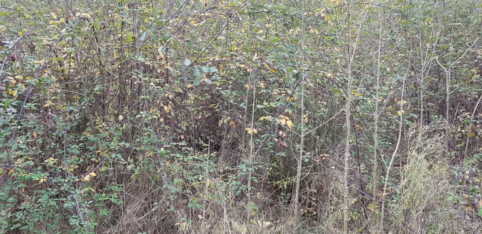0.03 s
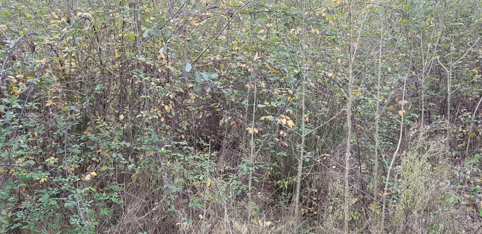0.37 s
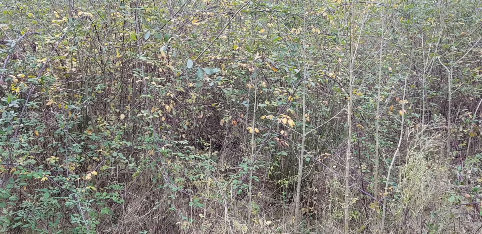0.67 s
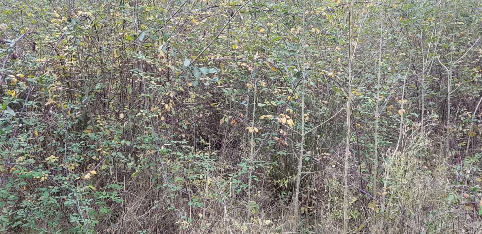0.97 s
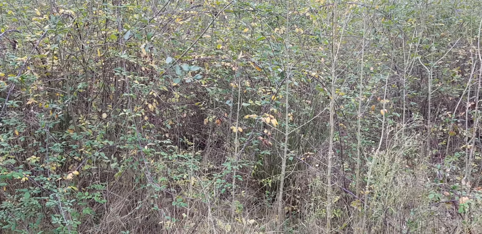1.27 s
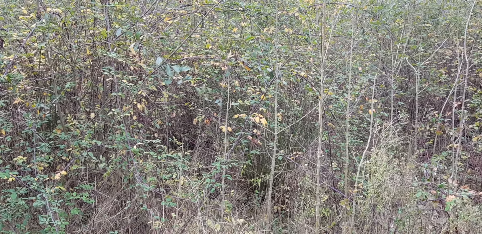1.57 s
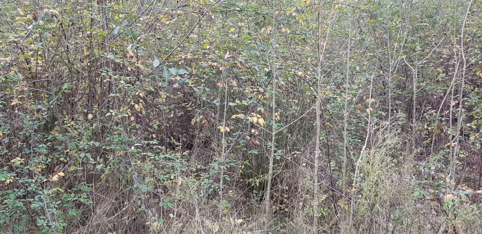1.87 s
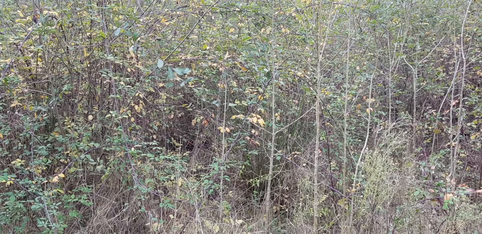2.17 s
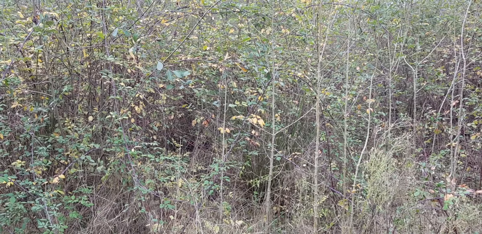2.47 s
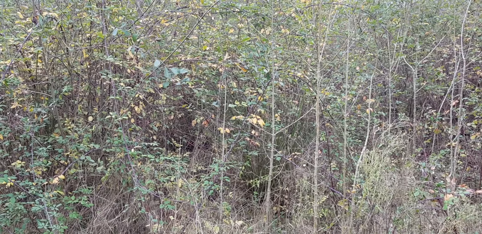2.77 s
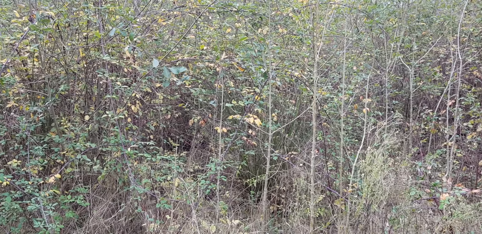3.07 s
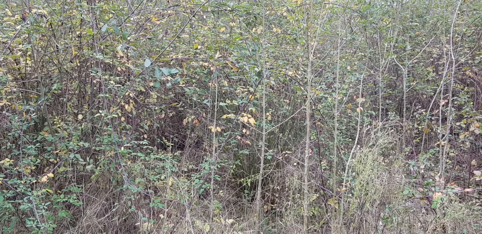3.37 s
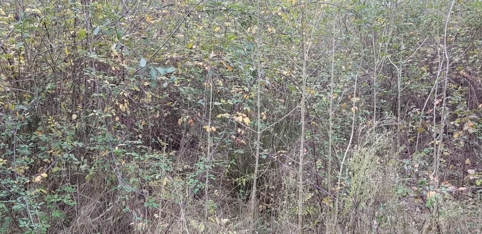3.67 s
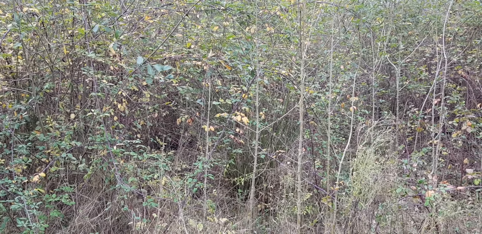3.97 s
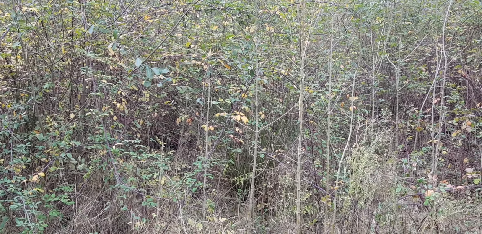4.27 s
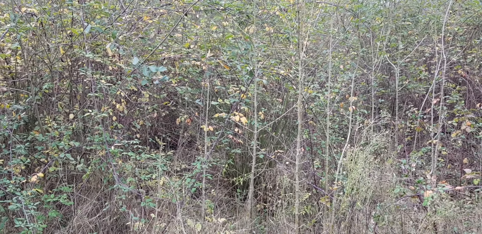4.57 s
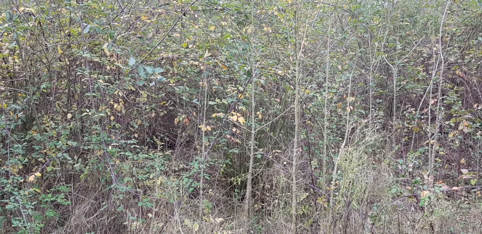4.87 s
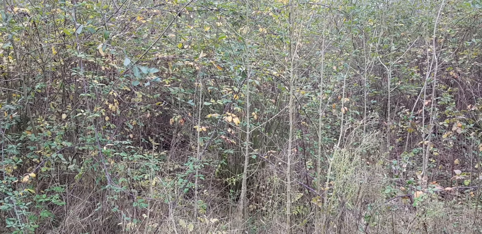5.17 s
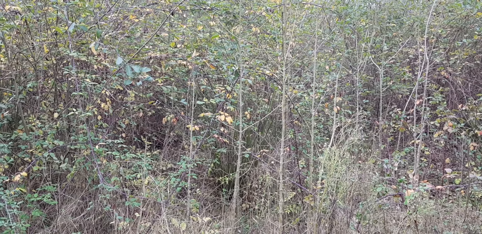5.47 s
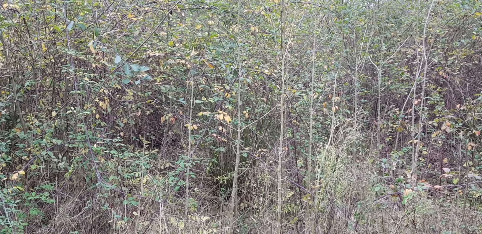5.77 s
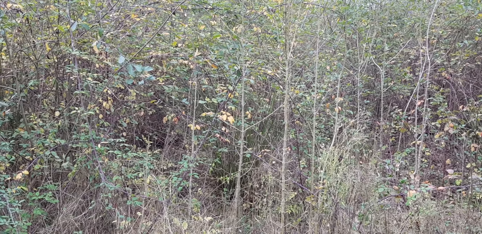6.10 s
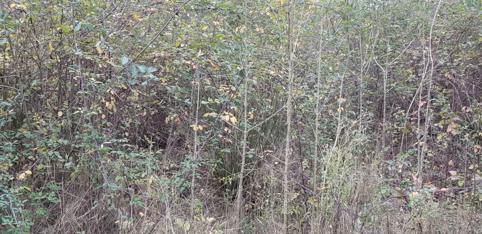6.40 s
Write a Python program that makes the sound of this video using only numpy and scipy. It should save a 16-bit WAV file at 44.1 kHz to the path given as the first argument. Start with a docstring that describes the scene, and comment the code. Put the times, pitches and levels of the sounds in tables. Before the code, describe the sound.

A hound gives short, high yelping bays in dense woodland scrub, the loudest sounds here. Each begins as a clean squeal, cracks hoarse and drops at the end, ringing briefly among the trees. The first three come at about 0.5, 1.1 and 2 seconds, with a fainter, echoing, falling yelp from a distant hound just ahead of the second. In the lull a dog gives one thin, quiet nasal whine at about 3.6 seconds. The near hound bays again, rougher, at 4.7 seconds. From 5 to nearly 6 seconds a farther hound holds a softer, lower howl that sags slightly. A tiny yip at its end leads to a last strong bay at about 6.2 seconds. Light wind rumbles on the microphone in puffs, mainly in the first second and again around 3 to 3.6 seconds. Underneath are a very faint hiss and a few barely audible leaf rustles.

```python
"""In a wood of dense scrub, a hound gives short yelping bays. Each starts as a clean squeal and drops
at the end; most break to half pitch on the way, as the period of the vocal folds doubles. Farther off
another hound yelps and later holds a long howl; one whines through its nose close by. Stems and trunks
scatter every call, so the wood rings. Light wind buffets the microphone over a faint hiss, and dry
leaves rustle now and then."""
import sys
import numpy as np
from scipy import signal
from scipy.fft import rfft, irfft
from scipy.io import wavfile

SR = 44100
rng = np.random.default_rng(int(sys.argv[2]) if len(sys.argv) > 2 else 0)


def wrap_up_sound(samples):
    """Save the sound to the file named by the first command line argument, as 16-bit audio."""
    columns = np.atleast_2d(samples).T
    # keep every value between -1 and 1, then stretch to whole-number steps
    tamed = np.clip(columns, -1, 1)
    steps = np.round(tamed * 32767).astype(np.int16)
    wavfile.write(sys.argv[1], SR, steps)


N = 288414
EDGE_HZ = 14500  # upper band limit


def gain_of(db):
    """Logarithmic level: 20 dB is a factor of ten in amplitude."""
    return 10 ** (np.asarray(db) / 20)


def unit_rms(x):
    """Power normalisation: scales to rms 1."""
    return x / np.sqrt(np.mean(abs(x) ** 2) + 1e-20)


def value_at(points, hz):
    """Interpolation of (frequency, value) points on a log-frequency axis."""
    f, value = np.transpose(points)
    return np.interp(np.log(hz + 1), np.log(f + 1), value)


def add(mix, start_s, sound):
    """Superposition: sums a sound into the mix."""
    part = mix[..., max(round(start_s * SR), 0):][..., :sound.shape[-1]]
    part += sound[..., :part.shape[-1]]


def placed(start_s, sound):
    """Time shift: a sound alone on a silent track."""
    track = np.zeros(N)
    add(track, start_s, sound)
    return track


def flutter(shape, hz):
    """Random modulation: complex noise low-passed at hz, rms 1."""
    white = rng.standard_normal(shape) + 1j * rng.standard_normal(shape)
    return unit_rms(signal.sosfilt(signal.butter(2, hz, fs=SR, output="sos"), white))


def noise(spectrum):
    """Spectral shaping: coloured noise, uncorrelated in the two channels, rms 1."""
    colour = gain_of(value_at(spectrum, np.fft.rfftfreq(N, 1 / SR)))
    return unit_rms(irfft(rfft(rng.standard_normal((2, N))) * colour, N))


def ports(x, lag_ms, pan_db):
    """Time and level difference between the two microphone ports, left minus right."""
    side, hz = np.array([[.5], [-.5]]), np.fft.rfftfreq(len(x), 1 / SR)
    delay = np.exp(-2j * np.pi * hz * side * lag_ms / 1000)
    return irfft(rfft(x) * delay, len(x)) * gain_of(pan_db * side)


def wind():
    """Turbulence: eddies buffet the microphone in puffs over a nearly steady breeze."""
    # puffs of wind: (start [s], length [s], relative level [dB])
    gusts = [(0.004, 0.011, -43.5), (0.042, 0.042, -43), (0.184, 0.055, -65), (0.348, 0.16, -39.5),
             (0.59, 0.19, -45), (0.816, 0.03, -59), (0.86, 0.25, -38), (1.471, 0.05, -47.5),
             (1.519, 0.023, -50), (2.215, 0.096, -47), (3.017, 0.032, -43), (3.355, 0.069, -44),
             (3.555, 0.077, -43), (5.669, 0.029, -49)]
    # eddy spectrum: (frequency [Hz], relative density [dB])
    spectrum = [(15, -23.5), (28, -10), (48, -2.5), (68, 0), (110, -8), (160, -17.5), (210, -23),
                (300, -27.5), (450, -40.5), (1000, -50), (3000, -82)]
    spread, eddy_s = 0.41, 0.024  # a puff's half width: this share of its length plus one eddy
    t = np.arange(N) / SR
    puff_power = sum(gain_of(db + 1) ** 2 * np.exp(-((t - s - length / 2) / (spread * length + eddy_s)) ** 2)
                     for s, length, db in gusts)
    breeze = gain_of(-57 + 0.01 * t)
    bumps = gain_of(5.0 * flutter((2, N), 13).real)
    eddies = noise(spectrum) * bumps
    partly_shared = unit_rms(eddies + 0.21 * eddies[::-1])
    return np.sqrt(breeze ** 2 + puff_power) * partly_shared


def air():
    """Broadband noise: a faint hiss, coloured a little differently at each port."""
    # hiss spectrum: (frequency [Hz], relative density [dB])
    spectrum = [(180, -41), (300, -28.5), (430, -14.5), (660, -7.5), (800, -15), (1400, -16), (1750, -18.5),
                (4000, -19), (7500, -22), (14300, -19)]
    # slow drift of the hiss: (time [s], level [dB])
    drift = [(0, -70.5), (1.501, -67), (2.602, -68), (4.2, -67), (6.54, -65)]
    # balance of the hiss: (frequency [Hz], left minus right [dB])
    balance = [(2000, -1.5), (6000, -2.5), (8000, 3.5), (10500, 8), (12000, 2), (14000, 2)]
    tilt = gain_of(np.array([[.5], [-.5]]) * value_at(balance, np.fft.rfftfreq(N, 1 / SR)))
    level = gain_of(np.interp(np.arange(N) / SR, *np.transpose(drift)))
    return level * irfft(rfft(noise(spectrum)) * tilt, N)


def call_course(tune, break_s=0, mend_s=0, depth=0, rough=0, bright_db=0, widest=0.5):
    """Register change: the course of a call that swells, tires and, given a depth, breaks."""
    attack_db, attack_s, release_db, release_s = 20, 0.0064, 3, 0.0022
    ring_hz, ring_width_hz, ring_db = 731, 135, 10.5  # main resonance of the throat
    flip_s, deepen_s = .005, 0.024  # time to change register; to double again at roughness 1
    waver_s, waver_share = 0.0082, 0.26  # the half pitch creeps in just ahead of the break
    clean_rough, tired_rough, flip_rough = 0.0077, .12, 0.12
    s, hz, effort = np.transpose(tune)
    t = np.linspace(s[0], s[-1], 200)
    hz, effort = np.interp(t, s, hz), np.interp(t, s, effort)
    along = (t - t[0]) / (t[-1] - t[0])
    effort -= attack_db * np.exp((t[0] - t) / attack_s) + release_db * np.exp((t - t[-1]) / release_s)
    fundamental_db = effort + ring_db / (1 + ((hz - ring_hz) / ring_width_hz) ** 2)
    overtones_db = effort + bright_db - 54 * (along - widest) ** 2  # the mouth opens and shuts
    in_break = (1 + np.tanh((t - break_s) / flip_s)) / 2 * (1 + np.tanh((mend_s - t) / flip_s)) / 2
    doublings = in_break * np.minimum(depth, 1 + np.maximum(t - break_s, 0) * rough / deepen_s)
    doublings = np.maximum(doublings, waver_share * min(depth, 1) * np.exp(-abs(t - break_s) / waver_s))
    flipping = np.sin(np.pi * in_break) ** 2
    roughness = clean_rough + tired_rough * along ** 2 + rough * in_break + flip_rough * flipping
    return np.transpose([t, hz, fundamental_db, overtones_db, doublings, roughness])


def voice(course, tract, jitter, shimmer, count):
    """Source and filter: vocal folds, whose period can double twice, sound through a tract."""
    s, *columns = np.transpose(course)
    t = np.arange(s[0], s[-1], 1 / SR)
    hz, low_db, overtones_db, doublings, rough = (np.interp(t, s, c) for c in columns)
    rough = np.clip(rough, 0, 1)
    hz = hz * (1 + jitter * (rough + 0.041) * flutter(len(t), 70).real)
    multiple = np.arange(1, count + 1)[:, None] / 4  # spectral lines a quarter of the pitch apart
    # each doubling fills in lines midway between the existing ones
    halves = np.clip(doublings, 0, 1) * np.where(multiple < 1, 1.05, .58)
    quarters = np.clip(doublings - 1, 0, 1) * np.where(multiple < 1, .7, .35)
    lines = np.where(multiple % 1 == 0, 1, np.where(multiple % .5 == 0, halves, quarters))
    smear = rough * (0.2 + 0.36 * multiple)  # irregular closures smear the high lines most
    colour = gain_of(value_at(tract, multiple * hz)) * (multiple * hz < EDGE_HZ)
    power = colour ** 2 * (lines ** 2 + smear ** 2)
    low = multiple[:, 0] < 1.4  # the fundamental and its neighbours share one level
    low_gain = gain_of(low_db) / np.sqrt(power[low].sum(0))
    overtone_gain = gain_of(overtones_db) / np.sqrt(power[~low].sum(0))
    gain = np.where(low[:, None], low_gain, overtone_gain)
    cycles = np.cumsum(hz) / SR
    phase = 2 * np.pi * multiple * cycles - multiple ** 2
    partials = gain * colour * (lines + smear * flutter(colour.shape, 72)) * np.exp(1j * phase)
    fade = np.clip(np.minimum(t - t[0], t[-1] - t) / 0.005, 0, 1)
    return np.sqrt(2) * fade * (1 + shimmer * flutter(len(t), 35).real) * partials.sum(0).real


def scatter(x, t60_scale, build_s):
    """Multiple scattering: echoes from stems and trunks build up, then die band by band."""
    # ring of the wood: (frequency [Hz], T60 at t60_scale 1 [s])
    ring = [(400, 1.62), (1000, 1.8), (2400, 1.75), (3500, 3.2), (8000, 0.41)]
    # colour of the echoes: (frequency [Hz], relative gain [dB])
    colour = [(500, 0.5), (1500, 7), (2600, 7.5), (3200, -16.5), (4000, -5), (8000, -8.5)]
    count, slot = 3000, 22  # one echo in every slot of samples
    arrivals = np.arange(count) * slot + rng.integers(0, slot, (2, count))
    taps = np.zeros((2, arrivals.max() + 1))
    np.put_along_axis(taps, arrivals, rng.choice([-1., 1.], arrivals.shape), 1)
    hz, t, bands = signal.stft(taps, SR, nperseg=256)
    t60 = t60_scale * value_at(ring, hz)[:, None]
    envelope = np.exp(-np.log(1000) * t / t60) * (1 - np.exp(-t / build_s))
    tail = signal.istft(bands * envelope * gain_of(value_at(colour, hz))[:, None], SR, nperseg=256)[1]
    tail /= np.sqrt(np.mean(abs(rfft(tail)[:, 600:3600]) ** 2))  # gain 1 over about 400-2400 Hz
    return signal.fftconvolve(x[None], tail, axes=1)[:, :N]


def near_hound():
    """Period doubling: squeals break into hoarse bays, echoed by the bushes and the wood."""
    # tune of each bay: (time [s], pitch [Hz], effort [dB])
    tunes = [
        [(.438, 713, -48), (.474, 766, -34), (.486, 978, -34), (.535, 934.6, -33.5), (.552, 956.6, -29.5),
         (.595, 943.7, -30.5), (.638, 1014, -32), (.652, 747, -40), (.664, 583, -30.5)],
        [(1.03, 790, -52.5), (1.07, 813, -36.5), (1.095, 980, -40.5), (1.124, 997, -34), (1.133, 1218, -29.5),
         (1.162, 1183, -24), (1.172, 1042, -31.5), (1.245, 943.4, -27.5), (1.262, 984, -25.5),
         (1.28, 1022, -37), (1.311, 535, -34.5)],
        [(2.01, 799, -48.5), (2.045, 760, -35.5), (2.087, 721, -32), (2.091, 846, -37.5), (2.125, 924, -32.5),
         (2.152, 925.6, -29), (2.156, 688, -32.5), (2.183, 708, -31), (2.211, 598, -37)],
        [(4.681, 1429, -24.5), (4.71, 1341, -38.5), (4.728, 1218, -27.5), (4.77, 1067, -31),
         (4.802, 1063, -40.5), (4.814, 1152, -27.5), (4.853, 1157, -38), (4.864, 740, -33.5),
         (4.878, 620, -35.5)],
        [(5.795, 620, -38), (5.808, 733, -38), (5.834, 584, -48.5)],
        [(6.118, 828, -21.5), (6.131, 875, -41), (6.157, 1384, -45), (6.183, 1334, -46), (6.203, 1306, -24.5),
         (6.229, 1152, -27.5), (6.243, 1014, -27), (6.287, 1022, -25), (6.32, 1068, -27.5), (6.335, 1153, -39),
         (6.357, 1154, -46.5), (6.381, 593, -37.5)],
    ]
    # voice break, colour and bearing of each bay: (break [s], mend [s], depth [doublings],
    # roughness [0-1], overtones over effort [dB], mouth widest [share of the bay],
    # resonance shift [factor], treble gain [dB], lag of the left port [ms], left minus right [dB])
    bays = [(0.47, 0.611, 1.22, 0.2, -7.5, 0.44, 0.96, -9, -0.076, 0.4),
            (1.167, 1.277, 1.3, 0.18, -11.5, 0.56, 1.005, -3, -0.099, 0.16),
            (2.08, 2.169, 0.89, 0.12, -2, 0.37, 0.94, 4, -0.042, -1.9),
            (4.765, 4.806, 2.3, 0.29, 2.5, .55, 1.038, 6.5, 0.039, -0.32),
            (5.78, 5.792, 0, 0.11, -17, 0.41, 1.5, -5, 0.13, 0.76),
            (6.234, 6.314, 1.5, 0.27, -4, 0.43, 1.114, 10, 0.1, -3.1)]
    # resonances of the open throat: (frequency [Hz], relative gain [dB])
    throat = [(250, -39.5), (370, -22.5), (480, 0), (740, 19.5), (1000, 2.5), (1400, -3.5), (1900, -5),
              (2400, -8), (2850, -17), (3250, -25.5), (3700, -24.5), (4250, -41), (5000, -62.5),
              (8000, -68.5)]
    # hiss of a hoarse throat: (frequency [Hz], relative density [dB])
    rasp_spectrum = [(2000, -27), (3500, 6), (4500, 2.5), (7000, -2.5), (9500, -6.5), (12000, -20.5),
                     (14000, -33)]
    direct = np.zeros((2, N))
    for tune, (*manner, shift, treble_db, lag_ms, pan_db) in zip(tunes, bays):
        # each bay has its own shift of the throat resonances and its own treble level
        tract = [(hz * shift, db + treble_db * (hz > 3500)) for hz, db in throat]
        bay = voice(call_course(tune, *manner), tract, jitter=.1, shimmer=.22, count=32)
        add(direct, tune[0][0], ports(bay, lag_ms, pan_db))
    calls = direct[0]
    # the hiss follows the effort of the voice and lingers among the leaves
    treble = signal.sosfilt(signal.butter(2, 1400, "highpass", fs=SR, output="sos"), calls)
    linger = np.exp(-1 / (.02 * SR))
    effort = np.sqrt(signal.lfilter([1 - linger], [1, -linger], treble ** 2))
    rasp = gain_of(-28) * effort * noise(rasp_spectrum)
    bushes = gain_of(-14.5) * scatter(calls, 0.46, 0.0013)
    wood = gain_of(-12.5) * scatter(calls, 0.63, 0.05)
    return gain_of(-1.31) * direct + rasp + bushes + wood


def unbroken(rows, rough):
    """Phonation in one register: a course with no doubling and an even roughness."""
    return [(*row, 0, rough) for row in rows]


def far_hound():
    """Reverberation: a yelp and a faint bay come mostly as echoes, a long ringing howl more directly."""
    # falling yelp: (time [s], pitch [Hz], effort [dB])
    yelp_tune = [(.862, 1788, -61.5), (.92, 1348, -53.5), (.95, 1265, -51), (.98, 1102, -55.5),
                 (1.03, 1065, -63)]
    # faint bay and sagging howl: (time [s], pitch [Hz], fundamental [dB], overtones [dB])
    bay_tune = [(4.25, 611.6, -87, -105), (4.32, 671, -65, -82), (4.4, 640, -87, -94)]
    howl_tune = [(5.0, 460.6, -80, -43.5), (5.04, 480.3, -49.5, -41.5), (5.1, 470.7, -46, -41),
                 (5.16, 477, -45.5, -43.5), (5.22, 512, -40.5, -53.5), (5.37, 468.8, -48, -50.5),
                 (5.56, 460.4, -45.5, -55.5), (5.78, 448.3, -46, -47.5), (5.85, 426.4, -54.5, -55)]
    # a thin, bright voice and one dulled by the scrub: (frequency [Hz], relative gain [dB])
    bright = [(600, -1.5), (1300, -3.5), (1900, 9), (3200, -13.5), (4300, -29.5), (8000, -52)]
    dull = [(250, 8.5), (470, 10.5), (950, 9.5), (1420, -4), (1900, -14), (2350, -42), (2900, -33),
            (6000, -55)]
    course = call_course(yelp_tune, break_s=.915, mend_s=1.2, depth=1, rough=.1, bright_db=9)
    yelp = voice(course, bright, jitter=0.18, shimmer=0.052, count=20)
    bay = voice(unbroken(bay_tune, rough=0.36), dull, jitter=0.066, shimmer=0.13, count=12)
    howl = voice(unbroken(howl_tune, rough=0.1), dull, jitter=0.14, shimmer=0.29, count=22)
    yelps = placed(yelp_tune[0][0], yelp) + placed(bay_tune[0][0], bay)
    howl = placed(howl_tune[0][0], howl)
    direct = gain_of(-6) * ports(yelps, lag_ms=.1, pan_db=0)
    direct += gain_of(4) * ports(howl, lag_ms=-0.43, pan_db=-2.5)
    yelp_echoes = gain_of(2) * scatter(yelps, .12, .003) + gain_of(1.5) * scatter(yelps, 0.94, 0.012)
    howl_echoes = scatter(howl, 0.28, 0.011) + gain_of(-0.5) * scatter(howl, 0.82, 0.021)
    return direct + yelp_echoes + howl_echoes


def leaves():
    """Shot noise: each rustle is a short swell of tiny random crackles."""
    # dry leaves stirring: (start [s], length [s], band frequency [Hz], level [dB])
    rustles = [(3.155, 0.12, 6400, -71.5), (3.299, 0.25, 7490, -77), (4.209, 0.13, 6760, -80.5),
               (4.345, 0.1, 4220, -74.5), (5.798, 0.13, 3040, -75), (5.994, 0.11, 7090, -73.5)]
    crackles_per_s = 2500
    out = np.zeros((2, N))
    for s, length, hz, db in rustles:
        n = round(length * SR)
        crackles = rng.standard_normal((2, n)) * (rng.random((2, n)) < crackles_per_s / SR)
        band = signal.butter(2, [hz * 0.86, hz * 1.08], "bandpass", fs=SR, output="sos")
        add(out, s, gain_of(db) * unit_rms(signal.sosfilt(band, crackles) * signal.windows.tukey(n, .7)))
    return out


def whining_hound():
    """Nasal resonance: one thin arch of pitch through the nose, roughening as it drops."""
    # the whine: (time [s], pitch [Hz], effort [dB])
    tune = [(3.561, 813, -51), (3.6, 1387, -60), (3.618, 1444, -43), (3.655, 1499, -45.5),
            (3.688, 1520, -50), (3.702, 1390, -54.5), (3.72, 940, -64)]
    # resonances of the nose: (frequency [Hz], relative gain [dB])
    nose = [(400, -15), (1500, -13.5), (3000, -0.5), (4500, -13.5), (6000, -12), (7500, -28), (14000, -57)]
    whine = voice(call_course(tune, widest=0.88), nose, jitter=0.16, shimmer=0.39, count=20)
    whine = placed(tune[0][0], whine)
    echoes = gain_of(-7.5) * scatter(whine, 0.44, 0.13) + gain_of(-4.5) * scatter(whine, 0.063, 0.0044)
    return ports(whine, lag_ms=-0.04, pan_db=-3.0) + echoes


def scene():
    """Superposition of hounds, wind, hiss and undergrowth."""
    return near_hound() + whining_hound() + far_hound() + wind() + air() + leaves()


def record(dry):
    """Band limiting: a linear-phase low-pass at EDGE_HZ."""
    lowpass = signal.firwin(511, EDGE_HZ, window=("kaiser", 9), fs=SR)
    return signal.oaconvolve(dry, lowpass[None], "same")


dry = scene()
out = record(dry)
wrap_up_sound(out)
```